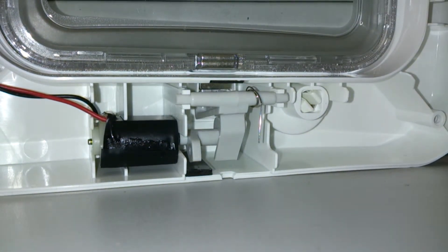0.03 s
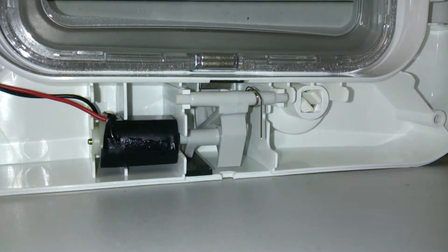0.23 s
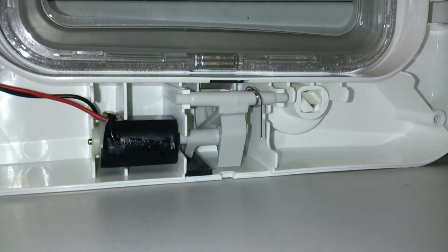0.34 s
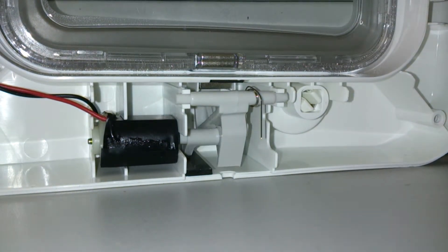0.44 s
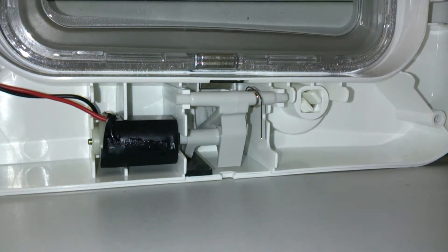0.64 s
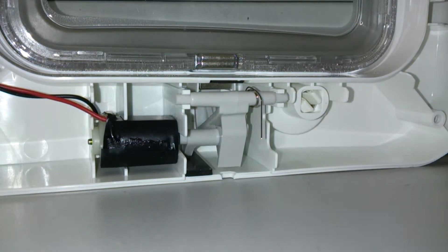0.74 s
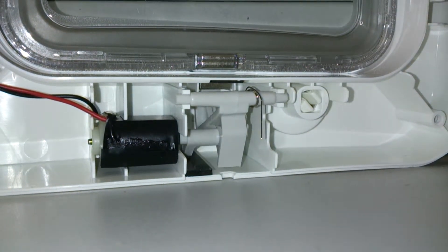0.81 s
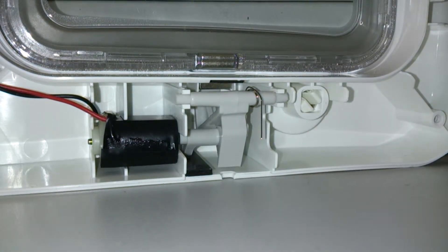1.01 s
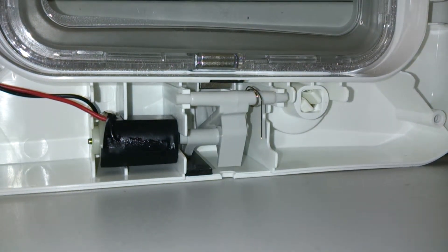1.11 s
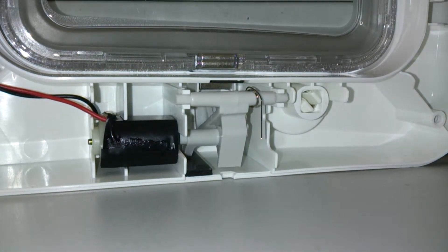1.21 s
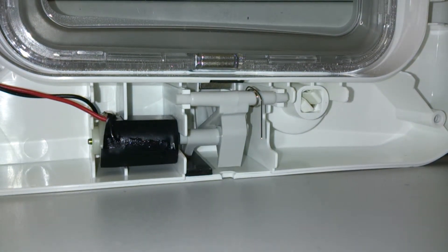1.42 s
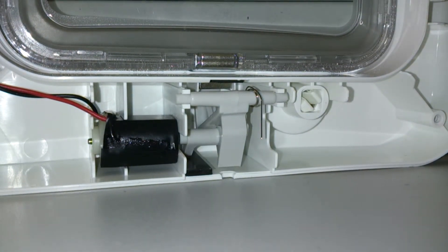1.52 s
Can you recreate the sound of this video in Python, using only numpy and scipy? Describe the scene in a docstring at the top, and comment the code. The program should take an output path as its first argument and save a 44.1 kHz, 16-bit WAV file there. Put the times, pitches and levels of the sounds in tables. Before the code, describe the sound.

A small electric latch clacks inside a plastic housing, close by in a quiet room. At 0.2 seconds a very brief scrape runs into a loud, sharp double clack, and the lever snaps back at 0.3 seconds. Two much softer clicking knocks follow at about 0.7 and 1.0 seconds, then a tiny, faint squeak near 1.25 seconds. Low rumble, hum and hiss lie faintly underneath throughout.

```python
"""A small electric actuator works a latch in an open plastic housing, close by in a quiet room.
On the first pulse the plunger scrapes along, slides the lever over, slams it on its stop and lets it
snap back. Two more pulses only knock the slack out of it, and a faint squeak follows the last.
Each contact sets off the housing's dense, short ringing and a few clear modes. Rumble, hum and hiss
lie underneath throughout. The two microphones have opposite polarity."""
import sys
import numpy as np
from scipy import signal
from scipy.io import wavfile

SR = 44100
rng = np.random.default_rng(int(sys.argv[2]) if len(sys.argv) > 2 else 0)


def materialize(psi):
    """Save the field psi as 16-bit PCM at rate SR to the path in sys.argv[1].

    A 1-D psi becomes a single channel; in a 2-D psi each row is a channel.
    """
    bounded = np.clip(np.atleast_2d(psi).T, -1, 1)
    quanta = np.round(bounded * 32767).astype(np.int16)
    wavfile.write(sys.argv[1], SR, quanta)


N = 68355
T = np.arange(N) / SR
EDGES = 20 * 2 ** (np.arange(40) / 4)   # quarter-octave bands [Hz]
CENTRES = np.sqrt(EDGES[1:] * EDGES[:-1])

# hits of plunger and lever; knock to modes are trims on the level, rise and t60 hold at 2 kHz:
# (time [s], level [dB], knock [dB], bass [dB], middle [dB], presence [dB], treble [dB], top [dB],
# modes [dB], rise [s], t60 [s])
CONTACTS = [ (0.2335, -9.5, -11, -5.5, -8.5, -7, -13.5, -12, -5, .002, 0.024),
            (.2490, -16.5, -4.5, -6.5, -2.5, 0, 1, -1.5, -2.5, 0.0025, 0.037),
            (0.307, -27, -21, -13, -14, 2.5, -4, -0.5, -5, 0.0017, 0.026),
            (.3090, -22, -8, -4.5, 3.5, -0.5, 3, -1, 4, 0.0025, 0.024),
            (.3265, -29.5, -5, -11, -22, -2.5, -4.5, -7.5, -5, 0.0028, 0.042),
            (0.3291, -41.5, -1, -3, 1, 5, -5, -1, 0, 0.0013, .05),
            (.5040, -42, -12, -15, -10, -9, -16.5, -14.5, -3.5, 0.0017, 0.035),
            (0.707, -47.5, -4, -4, 2, -2, -0.5, 7.5, -7, .0015, 0.021),
            (0.7094, -40.5, 7.5, 2, 5.5, -10, -10, -10, 7, 0.0012, 0.053),
            (0.7259, -31.5, 3, -3, -3.5, 0, -12, -17, -5.5, .0012, 0.031),
            (.7325, -38.5, 1, 4, 3, 2.5, 0, -8, -1.5, 0.0023, 0.039),
            (0.8037, -47, 2, -4, 1, -7.5, -14, -11, -3, 0.0025, 0.029),
            (1.0064, -48.5, -4, 3, -4, -3, -1.5, 7, 7.5, 0.0012, .028),
            (1.0090, -40, 10, 3.5, 5.5, -10, -11, -13.5, 6, 0.0012, 0.042),
            (1.0250, -34, 2, -0.5, -5.5, 0.5, -7.5, -13.5, -5, 0.00088, 0.033),
            (1.0294, -35, 1, -5, -1.5, -0.5, -7, -7.5, -2, 0.00068, 0.026),
            (1.0377, -37.5, -4, -7, -9, 1.5, -7.5, -9, -2.5, 0.00061, 0.026),
            (1.1033, -47, -3, 2, -3, -6.5, -14.5, -7, -3, 0.0017, 0.045)]
# likeness of the two microphones, centred lows and wide highs: (frequency [Hz], likeness [unclipped])
LIKENESS = [(200, 1.56), (330, 0.84), (700, 1.06), (1200, -0.2), (2000, -0.08), (5000, -0.74),
            (10000, -2.56)]
# the latch sits to the right: (frequency [Hz], right minus left [dB])
RIGHT_DB = [(300, 1.5), (700, 1), (1200, 5.8), (2200, 4.2), (5000, 2.9), (10000, 2.9)]


def from_db(db):
    """Decibels to gain."""
    return 10 ** (np.asarray(db) / 20)


def at_hz(points, hz):
    """Read a table on a log-frequency axis."""
    freqs, values = np.transpose(points)
    return np.interp(np.log(hz), np.log(freqs), values)


def decay(t, t60):
    """Exponential fade, 60 dB down after t60 seconds."""
    return np.exp(-np.log(1000) * t / np.maximum(t60, 1e-3))


def unit_energy(x):
    """Scale to energy 1 along time."""
    return x / np.sqrt(np.sum(x ** 2, axis=-1, keepdims=True) + 1e-20)


def pan(right_db):
    """Left and right gains for a level difference."""
    return from_db(np.stack([-right_db / 2, right_db / 2], axis=-1))[..., None]


def noise_bands(likeness, size):
    """Stereo noise, bands x 2 x size, each of rms 1; likeness sets how alike left and right are."""
    out = np.empty((len(CENTRES), 2, size))
    white = rng.standard_normal((2, 2, size + SR // 10))   # two feeds keep neighbouring bands unrelated
    for k, hz in enumerate(CENTRES):
        band = signal.butter(3, EDGES[k:k + 2], "band", fs=SR, output="sos")
        mid, side = unit_energy(signal.sosfilt(band, white[k % 2])[:, -size:])
        correlation = np.clip(at_hz(likeness, hz), 0, .99)
        mid *= np.sqrt((1 + correlation) * size / 2)
        side *= np.sqrt((1 - correlation) * size / 2)
        out[k] = mid + side, mid - side
    return out


def background():
    """A bed of low room rumble, a wavering hum and microphone hiss."""
    # rumble and hiss: (frequency [Hz], band level [dB])
    bed_levels = [(25, -62.5), (60, -73), (100, -71), (190, -69), (300, -72.5), (500, -76), (900, -82),
                  (1600, -86), (3000, -84), (5200, -77), (7000, -85.5), (8500, -81.5), (10500, -74),
                  (13000, -74), (15500, -75.5)]
    # narrow rumble, wide hiss: (frequency [Hz], likeness [0-1])
    bed_likeness = [(100, 0.79), (350, 0.83), (700, .62), (1200, 0), (10000, 0)]
    # balance of the bed: (frequency [Hz], right minus left [dB])
    bed_balance = [(30, 2.5), (150, 2), (700, 4), (1200, 4), (2500, 1), (6000, -2.5), (11000, 7.5)]
    hum_hz, hum_db = 188.6, -62.5
    waver = .45 * np.interp(T, T[::1800], rng.standard_normal(len(T[::1800])))
    hum = from_db(hum_db) * (1 + waver) * np.sin(2 * np.pi * hum_hz * T + waver)
    gains = from_db(at_hz(bed_levels, CENTRES))[:, None, None] * pan(at_hz(bed_balance, CENTRES))
    return np.sum(noise_bands(bed_likeness, N) * gains, axis=0) + hum * pan(right_db=6.5)


def room(x, size=20000):
    """Quick reflections from the table and the lid, and a faint room tail."""
    # early reflections: (frequency [Hz], level [dB])
    early_levels = [(300, -9), (1200, -14), (2500, -14.5), (5500, -19.5), (12000, -17.5)]
    # room tail: (frequency [Hz], level [dB])
    tail_levels = [(300, -17), (1200, -21), (2500, -24), (5500, -27), (12000, -29.5)]
    # length of the tail: (frequency [Hz], t60 [s])
    tail_t60 = [(300, 0.462), (1200, 0.43), (4000, .33), (12000, .25)]
    t, hz, predelay_s = T[:size], CENTRES[:, None, None], .0054
    reflections = noise_bands(LIKENESS, size) * np.clip(t / predelay_s - 1, 0, 1)
    early = unit_energy(reflections * decay(t, t60=.08)) * from_db(at_hz(early_levels, hz))
    tail = unit_energy(reflections * decay(t, at_hz(tail_t60, hz))) * from_db(at_hz(tail_levels, hz))
    band_weight = np.sqrt(2 * np.diff(EDGES) / SR)[:, None, None]
    response = np.sum((early + tail) * band_weight, axis=0)
    return signal.fftconvolve(x, response, axes=1)[:, :N]


def squeak(peak_s=1.255, width_s=.017, hz=1400, db=-67):
    """A faint, short, wavering squeak after the last pulse."""
    waver = np.interp(T, T[::400], rng.standard_normal(len(T[::400])))
    swell = np.exp(-((T - peak_s) / width_s) ** 2)
    return from_db(db) * swell * np.sin(2 * np.pi * hz * T + waver)


def housing_gains():
    """How strongly each band of the housing reaches each microphone."""
    # tone of the dense ringing: (frequency [Hz], band level [dB])
    housing_levels = [(120, -47), (230, -28), (320, -15.5), (440, -23), (570, -17), (800, -15.5),
                      (1000, -16.5), (1250, -13), (1550, -13.5), (2050, -8.5), (2550, -9.5), (3200, -9),
                      (4200, -12), (5200, -9), (6500, -13.5), (8300, -15.5), (10000, -9.5), (14500, -16)]
    return from_db(at_hz(housing_levels, CENTRES))[:, None, None] * pan(at_hz(RIGHT_DB, CENTRES))


def radiate(x, low_cut_hz=200):
    """The housing's shape lifts some narrow ranges and cancels others; it is too small for deep bass."""
    # humps and hollows, as bell filters: (frequency [Hz], gain [dB], width [Hz])
    housing_bells = [(333.6, 5.5, 60), (455.2, -10, 65), (680, -0.5, 25), (900, -5, 130), (1235, 10, 90),
                     (1360, -4, 43), (1503, -8, 70), (2070, 4, 200), (2810, -8.5, 110), (3030, 4.5, 200),
                     (4130, -6.5, 170), (5550, 7.5, 350), (5960, -6.5, 370), (6860, 3.5, 500),
                     (7760, -2, 260)]
    for hz, db, width_hz in housing_bells:
        gain, width = from_db(db / 2), np.tan(np.pi * width_hz / SR)
        tuning = -2 * np.cos(2 * np.pi * hz / SR)
        feedforward = [1 + width * gain, tuning, 1 - width * gain]
        feedback = [1 + width / gain, tuning, 1 - width / gain]
        x = signal.lfilter(feedforward, feedback, x + 1e-18)
    return signal.sosfilt(signal.butter(4, low_cut_hz, "high", fs=SR, output="sos"), x)


def plunger_slide(start_s=.2055, end_s=.228, rise_s=.007, db=-44, grain_db=1.5, size=14000):
    """The plunger scrapes along its guide until the lever strikes."""
    # tone of the scrape, on top of the housing's: (frequency [Hz], trim [dB])
    scrape_trims = [(300, 3), (1200, 1), (2500, 3), (5000, -8), (10000, -7)]
    t = T[:size]
    stroke = np.clip((t - start_s) / rise_s, 0, 1) * decay(np.maximum(t - end_s, 0), t60=.03)
    grain = from_db(grain_db * np.interp(t, t[::64], rng.standard_normal(len(t[::64]))))
    colour = from_db(db + at_hz(scrape_trims, CENTRES))[:, None, None]
    friction = np.sum(noise_bands(LIKENESS, size) * housing_gains() * colour, axis=0)
    return np.pad(stroke * grain * friction, ((0, 0), (0, N - size)))


def mode_ringing(trim_db=-6, scatter_db=1.5, delay_s=.0015):
    """The contacts strike the housing's clear modes, each a little differently."""
    # clear modes of the housing: (frequency [Hz], level [dB], t60 [s])
    housing_modes = [(322, -24, .08), (584, -14.5, 0.067), (770.4, -13, 0.098), (1016, -18.5, 0.12),
                     (1170, -30.5, 0.25), (1212, -11, .04), (1241, -13.5, 0.048), (1263, -29, 0.18),
                     (1556, -18.5, .09), (1983, -15.5, 0.073), (2206, -17.5, 0.059), (2500, -15, .075),
                     (2622, -18, 0.07), (3030, -18, 0.034), (3370, -25, 0.094), (3744, -24.5, 0.12)]
    times, hit_db, *_, ring_db, _, _ = np.transpose(CONTACTS)
    onsets = ((times + delay_s) * SR).astype(int)
    scatter = scatter_db * rng.standard_normal((len(times), len(housing_modes)))
    out = np.zeros((2, N))
    for k, (hz, mode_db, t60) in enumerate(housing_modes):
        strikes = np.zeros(N)
        strikes[onsets] = from_db(hit_db + ring_db + mode_db + trim_db + scatter[:, k])
        radius, angle = decay(1 / SR, t60), 2 * np.pi * hz / SR
        feedback = [1, -2 * radius * np.cos(angle), radius ** 2]
        out += pan(at_hz(RIGHT_DB, hz)) * signal.lfilter([0, np.sin(angle)], feedback, strikes + 1e-18)
    return out


def clacks(shared=.4, size=3000):
    """Each contact swells for a moment and dies in the housing's dense ringing, the bass last."""
    # where knock, bass, middle, the untrimmed pivot, presence, treble and top lie: (frequency [Hz])
    trim_hz = [330, 650, 1200, 2000, 3200, 5200, 10000]
    out, t = np.zeros((2, N + size)), T[:size]
    lowness = (trim_hz[3] / CENTRES)[:, None, None]
    common = noise_bands(LIKENESS, size)   # the share of the ringing that is alike in every hit
    fresh = noise_bands(LIKENESS, N + size)
    for time, db, *trims, _, rise, t60 in CONTACTS:
        onset = int(time * SR)
        band_rise, band_t60 = rise * lowness ** .12, t60 * lowness ** .16
        envelope = np.minimum(t / band_rise, 1) ** 2 * decay(np.maximum(t - band_rise, 0), band_t60)
        grain = np.sqrt(shared) * common + np.sqrt(1 - shared) * fresh[..., onset:onset + size]
        burst = unit_energy(grain * envelope) * np.linalg.norm(envelope, axis=-1, keepdims=True)
        colour_db = at_hz(list(zip(trim_hz, np.insert(trims, 3, 0))), CENTRES)
        gains = housing_gains() * from_db(db + colour_db)[:, None, None]
        out[:, onset:onset + size] += np.sum(burst * gains, axis=0)
    return out[:, :N]


def scene():
    """The latch in its room; its sound reaches the left microphone first."""
    left_lead_s = .00017
    latch = radiate(clacks() + mode_ringing() + plunger_slide())
    left, right = latch + room(latch) + squeak()
    return np.array([np.roll(left, -round(left_lead_s * SR)), right]) + background()


def record(dry):
    """The left channel's polarity is flipped and the top is cut steeply."""
    cutoff_hz = 15600
    high_cut = signal.ellip(10, .05, 60, cutoff_hz, fs=SR, output="sos")
    return signal.sosfiltfilt(high_cut, dry * [[-1], [1]])


dry = scene()
out = record(dry)
materialize(out)
```